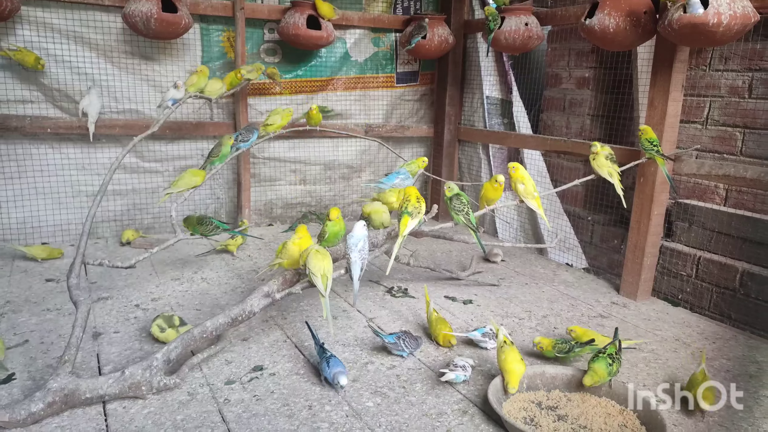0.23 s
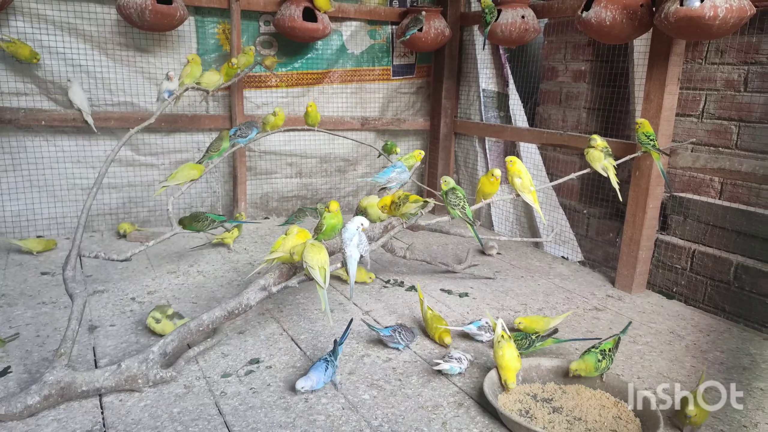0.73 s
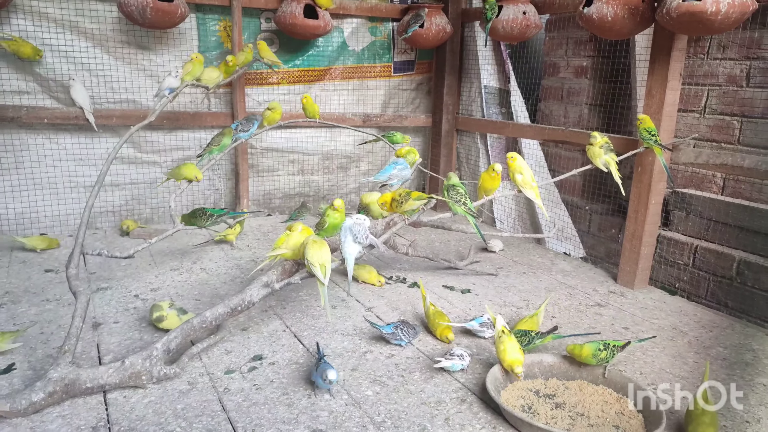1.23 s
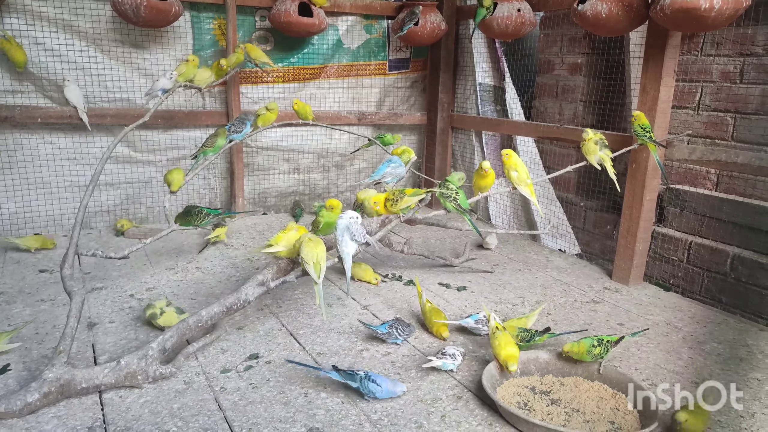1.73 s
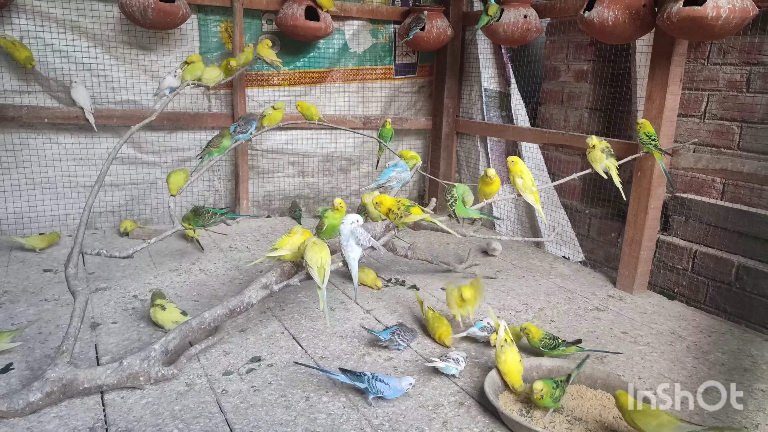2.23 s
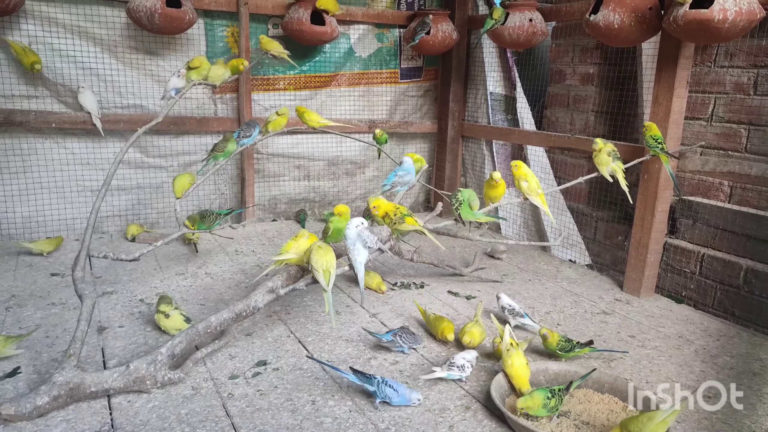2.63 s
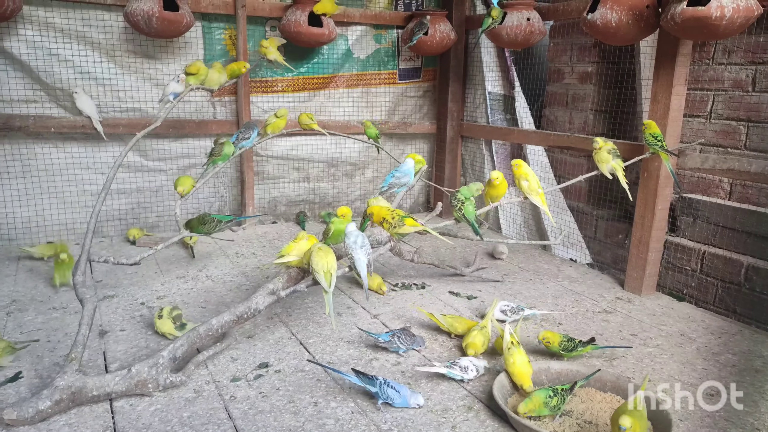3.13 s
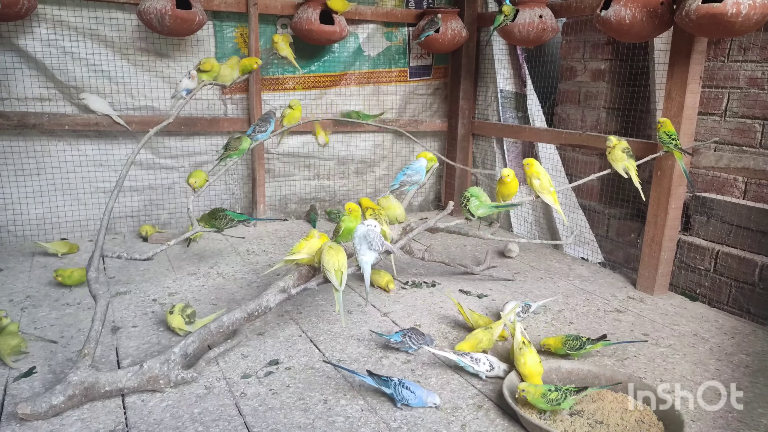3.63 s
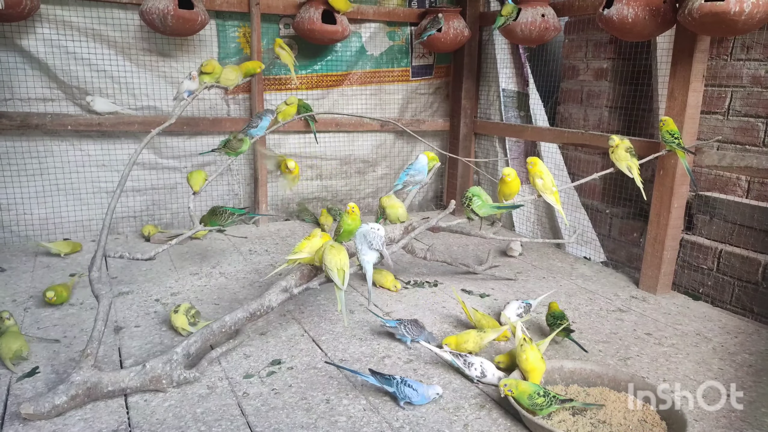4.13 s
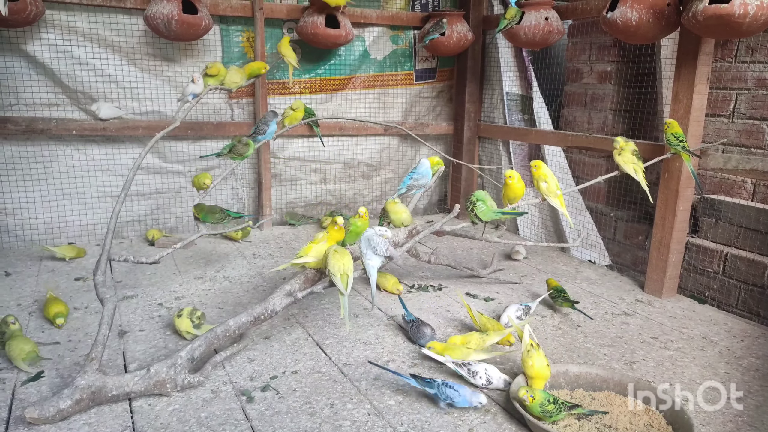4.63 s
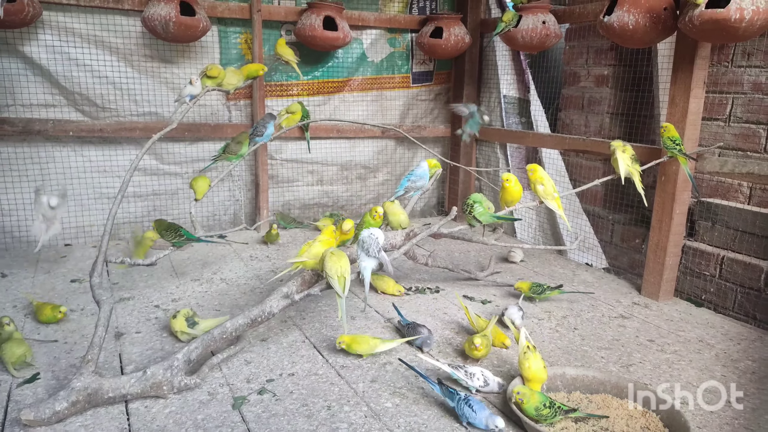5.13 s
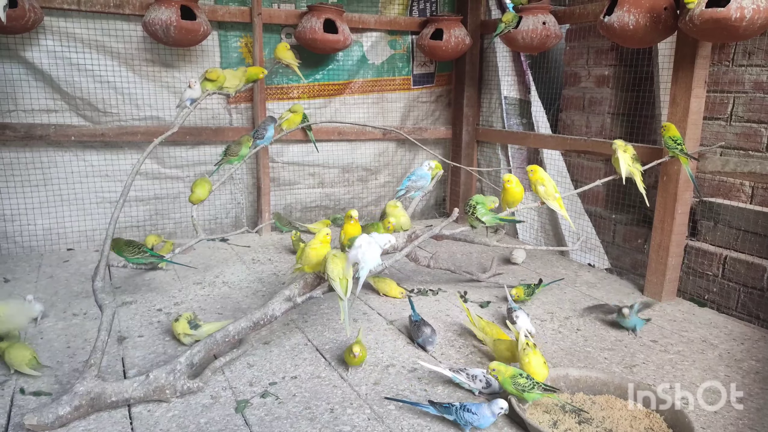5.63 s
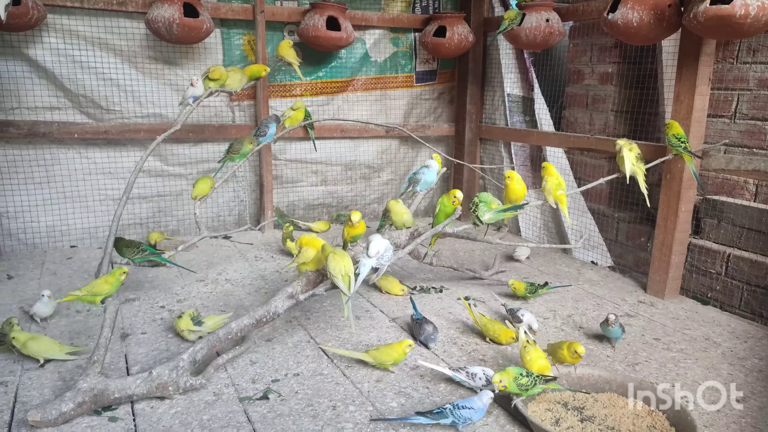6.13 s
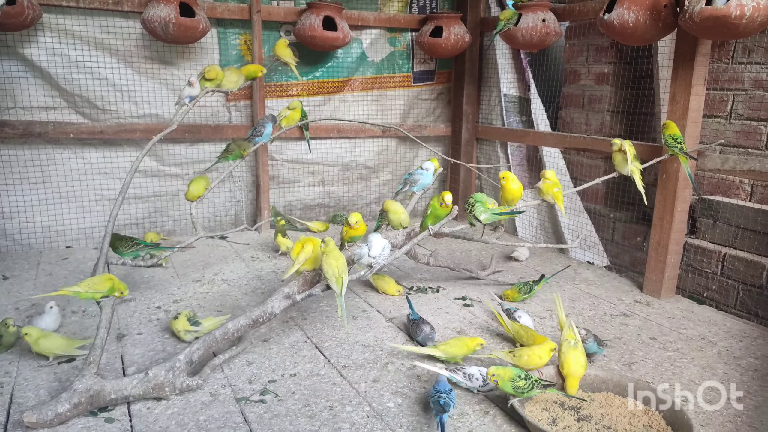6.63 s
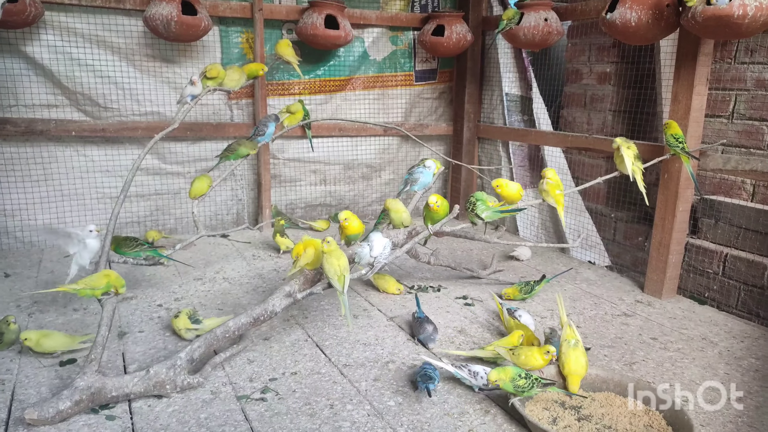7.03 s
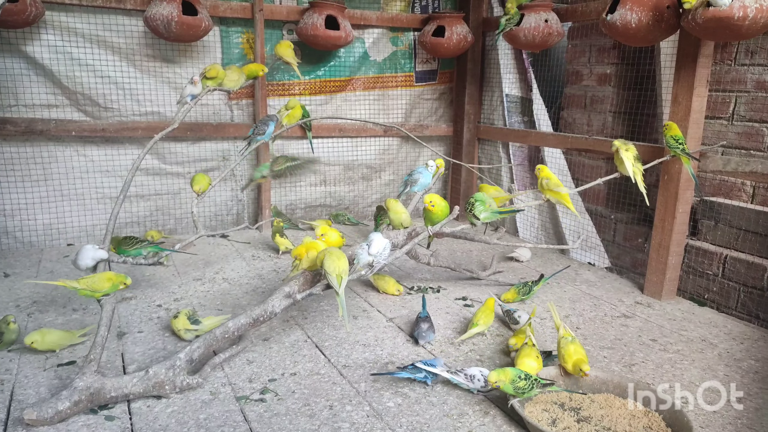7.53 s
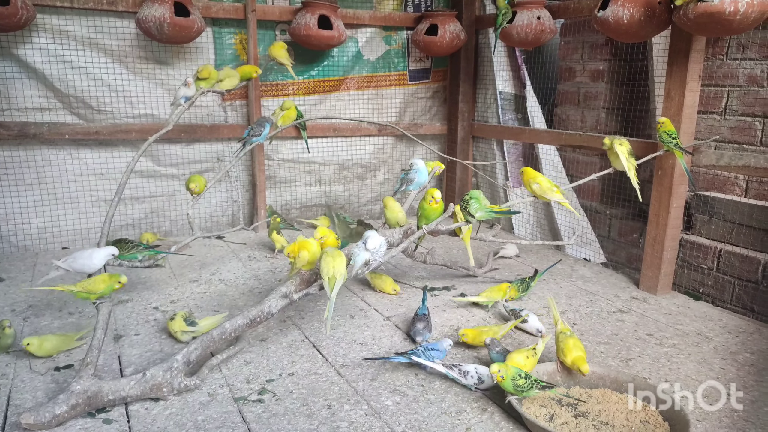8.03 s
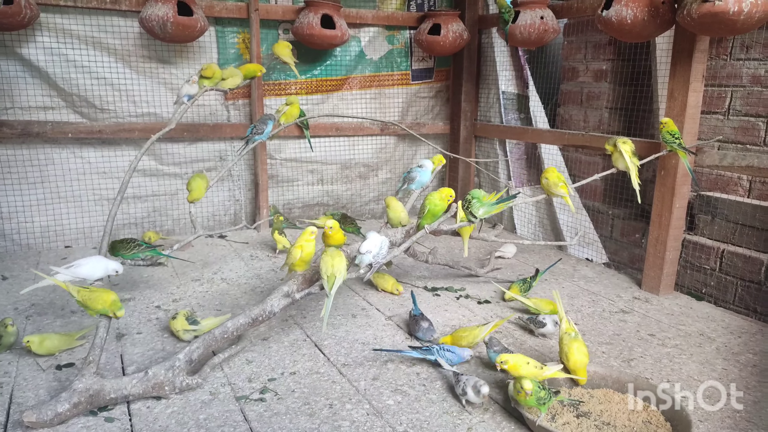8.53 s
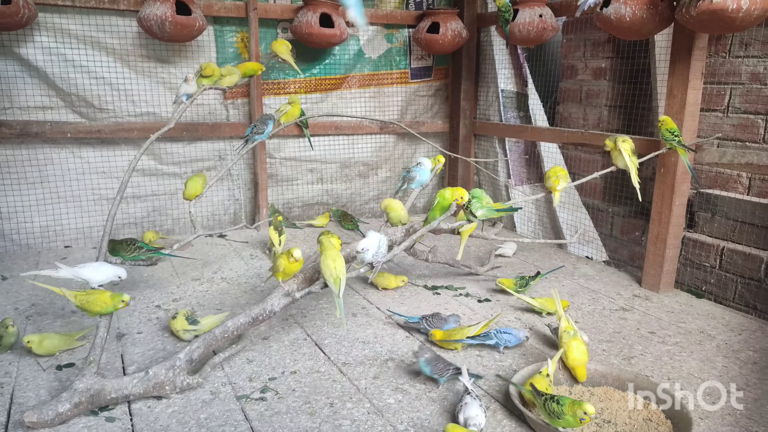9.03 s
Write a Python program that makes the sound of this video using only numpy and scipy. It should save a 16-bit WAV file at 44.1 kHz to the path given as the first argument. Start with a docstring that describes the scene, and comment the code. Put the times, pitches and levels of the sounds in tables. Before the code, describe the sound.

A large flock of budgerigars chatters throughout about nine seconds in a brick-and-mesh aviary, heard by a close stereo microphone with a short, dry room echo. Distant birds merge into a dense, shimmering warble over a very quiet outdoor rumble. From the start, near birds give brief raspy scolds; a muted low knock falls near 0.55 and a tiny tick at 1.15. Rasps crowd together between 1 and 2.1, loudest around 2, while wings flutter softly and puff air near 1.1 and 1.7. The foreground thins around 2.2 to 2.9, then bright piping chirps ring at about 3.1. Scolds resume, with faint wing whirs near 3.2 and flutter near 4. Tiny knocks touch 4.8 to 5.9. A sharp whistle stands out near 6.9, and the background swells and dips. After 7.5, faint flutter, mixed rasps and clear chirps continue to the end without settling.

```python
"""A flock of small parrots chatters in an aviary with brick and mesh walls, near a two-port microphone.
Near birds whistle gliding syrinx tones and scold in rasps, where irregular pulses chop chaotic tones and
turbulence; farther birds blend into a warble of many notes over shaped noise. Wings flutter faintly, whir
and push puffs of air as short swelling tones, a few damped knocks ring, and outdoor rumble lies underneath."""
import sys
import numpy as np
from scipy import signal
from scipy.fft import rfft, irfft
from scipy.io import wavfile
from scipy.ndimage import uniform_filter1d

SR = 44100
rng = np.random.default_rng(int(sys.argv[2]) if len(sys.argv) > 2 else 0)


def dump_mix(stems):
    """Bounce the given channels to the path in sys.argv[1] as a 16-bit WAV at rate SR."""
    frames = np.atleast_2d(stems).T  # one column per channel
    limited = np.clip(frames, -1, 1)  # hard clip at full scale
    pcm = np.round(limited * 32767).astype(np.int16)
    wavfile.write(sys.argv[1], SR, pcm)


N = 409248  # samples in the scene

# coherence of diffuse sound between the two ports: frequency_hz, likeness (0-1)
PORT_LIKENESS = [(40, 0.59), (200, 0.99), (440, 0.64), (730, 0.45), (1200, 0.14)]


def gain_of(db):
    """Converts a level in decibels to an amplitude ratio."""
    return 10 ** (np.asarray(db) / 20)


def evened(x):
    """Normalises the mean power, giving an rms of 1."""
    return x / np.sqrt(np.mean(x ** 2) + 1e-20)


def read(points, hz):
    """Interpolates a frequency-dependent quantity along a logarithmic frequency axis."""
    f, value = np.transpose(points)
    return np.interp(np.log(hz + 1), np.log(f + 1), value)


def wander(length, smooth):
    """Low-passes white noise with two moving averages into a slow random modulation of rms 1."""
    once = uniform_filter1d(rng.standard_normal(length), int(smooth))
    return evened(uniform_filter1d(once, int(smooth)))


def add(mix, s, sound, pan_db):
    """Places a sound by level and time difference: it reaches the right port a little later."""
    late = rng.integers(2, 21)  # samples
    for side, shift, sign in zip(mix, (0, late), (1, -1)):
        part = side[round(s * SR) + shift:][:len(sound)]
        part += gain_of(sign * pan_db / 2) * sound[:len(part)]


def resonate(x, hz, width):
    """Excites a fixed resonance; one complex pole passed twice gives it steep flanks."""
    r = np.exp(-np.pi * width / SR)
    pole = [1, -r * np.exp(2j * np.pi * hz / SR)]
    once = signal.lfilter([1], pole, x)
    return evened(signal.lfilter([1], pole, once).real)


def noise(tone, same, patchy_db, size):
    """Partly coherent two-port noise from random short-time spectra with drifting patches."""
    hop = size // 4
    hz = np.fft.rfftfreq(size, 1 / SR)
    a, b, c, d, patches = rng.standard_normal((N // hop + 5, len(hz), 5)).T
    patches = uniform_filter1d(patches, 6, axis=0)  # smooth over frequency, then over time
    patches = evened(uniform_filter1d(patches, 12, axis=1))
    like = np.clip(read(same, hz), -1, 1)[:, None]
    left, other = a + 1j * b, c + 1j * d
    z = np.array([left, like * left + np.sqrt(1 - like ** 2) * other])
    z *= gain_of(read(tone, hz)[:, None] + patchy_db * patches)
    return evened(signal.istft(z, nperseg=size, noverlap=size - hop)[1][:, :N])


def aviary(x):
    """Reverberates by convolution with sparse random-sign taps, unlike per port, each band decaying at its rate."""
    # reverberation time of the aviary: frequency_hz, t60_s
    decay_times = [(1000, .25), (3000, .16), (8000, .09)]
    taps = np.zeros((2, 16000))
    at = np.arange(120, 15960, 20) + rng.integers(0, 20, (2, 792))
    np.put_along_axis(taps, at, rng.choice([-1., 1.], at.shape), axis=1)
    hz, t, z = signal.stft(taps, SR, nperseg=256)
    decay = gain_of(-60 * t / read(decay_times, hz)[:, None])
    tail = signal.istft(z * decay, SR, nperseg=256)[1]
    return signal.fftconvolve(x, tail / np.linalg.norm(tail[0]), axes=1)[:, :N]


def whistle(length, pitch, rough, overtone_db=-26):
    """A syrinx tone with one overtone glides through three pitches; roughness shakes its pitch and level."""
    u = np.linspace(0, 1, int(length * SR))
    a, b, c = pitch
    hz = a * (1 - u) * (1 - 2 * u) + 4 * b * u * (1 - u) + c * u * (2 * u - 1)  # parabola through all three
    hz *= 1 + (.008 + .035 * rough) * wander(len(u), 130)
    turn = 2 * np.pi * np.cumsum(hz) / SR
    tone = np.sin(turn) + gain_of(overtone_db) * np.sin(2 * turn)
    shake = gain_of((4 + 4 * rough) * np.tanh(wander(len(u), 70)))
    return evened(tone * shake * np.sin(np.pi * u) ** .5)


def far_birds(count=900):
    """Superposes many whistles and their echoes on a noise blur, with level and spectral tilt changing in time."""
    # level and brightness of the farther birds: start_s, level_db, tilt_db_per_octave
    course = [(0, -29, 2), (.6, -29, 3), (2.3, -28, 3), (2.75, -31.5, 1.5), (3.4, -30.5, 2.5),
              (3.8, -27, 2), (3.98, -31.5, 0), (4.14, -32.5, 3.5), (4.3, -27, 4), (5.4, -28.5, 2.5),
              (6.4, -26, 2.5), (7.4, -26.5, 6), (7.8, -30.5, -1), (8.4, -26, 4.5), (9.28, -29, 3.5)]
    # relative spectrum of the flock: frequency_hz, level_db
    flock_spectrum = [(410, -48), (700, -13), (1540, -10), (2450, -0.5), (5010, -8), (5900, -8.5),
                      (8480, -20.5), (9490, -30.5), (10200, -34), (14000, -33)]
    notes = np.zeros((2, N))
    for when, low, long, a, c, loud, pan in rng.random((count, 7)):
        hz = 950 * 2 ** (2.7 * low ** .65)
        pitch = (hz * (.8 + 0.3006 * a), hz, hz * (.8 + 0.301 * c))
        note = whistle(.015 + .04 * long, pitch, rough=0.926)
        add(notes, when * N / SR, gain_of(read(flock_spectrum, hz) + 3.5 * loud) * note, 8 * (pan - .5))
    warble = evened(aviary(notes) + 1.23 * notes)
    flock = warble + gain_of(-2.5) * noise(flock_spectrum, PORT_LIKENESS, 4.23, size=512)
    hz, t, z = signal.stft(flock, SR, nperseg=512)
    s, db, tilt = np.transpose(course)
    octaves = np.log2((hz[:, None] + 1) / 3000)  # the tilt pivots at 3000 Hz
    z *= gain_of(np.interp(t, s, db) + np.interp(t, s, tilt) * octaves)
    return signal.istft(z, SR, nperseg=512)[1][:, :N]


def rumble():
    """Distant outdoor rumble: low-frequency noise, highly coherent between the ports around 200 Hz."""
    # relative spectrum of the rumble: frequency_hz, level_db
    rumble_spectrum = [(12, -30), (20, 4), (40, -5), (97, -7), (189, -4.5), (300, -9), (510, -11),
                       (659, -12.5), (1010, -36), (1200, -6.5), (1560, -47), (2640, -120)]
    return gain_of(-50.5) * noise(rumble_spectrum, PORT_LIKENESS, 2.9, size=2048)


def flutter():
    """Distant wings: amplitude modulation at 16 Hz of noise in a narrow resonance, alike at both ports."""
    # level of the distant flutter: time_s, level_db
    flutter_levels = [(0, -74), (1.2, -51.5), (2, -60), (3.6, -60.5), (4, -51), (4.4, -65.5), (6.2, -55),
                      (6.6, -73), (7.4, -71), (7.6, -53.5), (9.28, -57.5)]
    t = np.arange(N) / SR
    throb = 1 + 0.32 * np.sin(2 * np.pi * 16.0 * t)
    beating = evened(throb * resonate(rng.standard_normal(N), 488, 107))
    return gain_of(np.interp(t, *np.transpose(flutter_levels))) * beating


def squeal(hz, length, spread):
    """Frequency modulation: a syrinx tone glides slowly and is thrown about chaotically in pitch."""
    bend = 2 * np.tanh(.2 * wander(length, 600) + .25 * wander(length, 79.6))
    return np.sin(2 * np.pi * np.cumsum(hz * np.exp(spread * bend)) / SR)


def rasp(length, beak_hz, throat_db, crest, pulse_hz=300, jitter=0.404, breath=0.74):
    """Irregular pulses chop two chaotic tones and the turbulence that rings in beak and throat."""
    n = int((length + .03) * SR)
    turns = np.cumsum(pulse_hz * np.exp(jitter * wander(n, 118.5))) / SR
    pulses = .3 + np.sin(np.pi * turns) ** 2 * gain_of(4 * np.tanh(wander(n, 150)))
    turbulence = pulses * rng.standard_normal(n)
    beak = evened(pulses * squeal(beak_hz * 1.1, n, .2))
    beak += breath * resonate(turbulence, beak_hz * 1.128, 3320)
    throat = evened(pulses * squeal(beak_hz * .62, n, 0.27))
    throat += breath * resonate(turbulence, beak_hz * 0.71, 2700)
    hiss = resonate(turbulence, 10900, 5900)
    t = np.arange(n) / SR
    edges = np.clip(t / .02, 0, 1) * np.clip((t[-1] - t) / .035, 0, 1)
    swell = edges * gain_of(-11 * abs(t / length - crest) + 2 * np.tanh(wander(n, 470)))
    return (beak + gain_of(throat_db) * throat + gain_of(-22.5) * hiss) * swell


def near_rasps():
    """Scolding calls: the beak opens wider with effort, raising its resonance; a high-pass leaves no bass."""
    # scolding rasps: start_s, length_s, level_db, throat_to_beak_db
    rasp_calls = [(0.068, 0.059, -32.5, -16), (0.297, 0.059, -27, -2), (0.573, 0.095, -21.5, -9),
                  (.753, .058, -25.5, -2), (.865, 0.046, -29.5, 0.5), (0.947, 0.055, -24.5, -18),
                  (1.019, .11, -23, -10), (1.117, 0.054, -24, -7), (1.237, 0.038, -24.5, -13),
                  (1.301, 0.033, -27, -5), (1.411, .11, -19.5, -8), (1.505, 0.05, -22, -18),
                  (1.553, 0.039, -20, -9), (1.671, 0.11, -20.5, -9), (1.81, 0.11, -20, -8.5),
                  (2.012, 0.09, -17, -8.5), (2.25, 0.17, -31, -2.5), (2.47, .17, -29, -5.5),
                  (2.903, 0.057, -31, -17), (3.059, 0.059, -27, -1), (3.277, 0.073, -23, -8.5),
                  (3.433, .1, -21.5, -9), (3.604, .1, -27.5, -9), (3.749, 0.081, -21, -8.5),
                  (3.88, 0.065, -29, -1.5), (4.015, 0.033, -26.5, -5), (4.062, 0.035, -27.5, -0.5),
                  (4.177, 0.077, -23.5, -4.5), (4.239, 0.1, -25.5, -8), (4.333, 0.047, -21, -6.5),
                  (4.429, 0.087, -24, -4), (4.699, 0.041, -22.5, -22), (4.787, 0.063, -26, -9.5),
                  (4.88, 0.074, -31, 1), (5.03, .044, -23, -25), (5.1, 0.037, -23, -25),
                  (5.436, 0.072, -22.5, -17), (5.533, .11, -22, -9), (5.788, .045, -29, -3),
                  (5.949, 0.055, -23.5, -2.5), (6.011, .056, -25, -8), (6.111, 0.23, -25, -4.5),
                  (6.427, 0.051, -28, -1), (6.628, 0.064, -29.5, -17), (6.791, .05, -22, -4),
                  (6.924, 0.12, -24.5, 0), (7.179, .14, -28, -4.5), (7.381, 0.13, -25, 0),
                  (7.59, .15, -24.5, -3), (7.877, 0.095, -29, -4), (7.989, 0.032, -26.5, -4),
                  (8.057, 0.087, -25, -0.5), (8.208, 0.057, -22.5, -12), (8.279, .14, -22.5, -13),
                  (8.506, .11, -34, 5), (8.641, .055, -25, -0.5), (8.796, 0.098, -23, -2.5),
                  (8.997, 0.064, -29, -5), (9.099, .12, -23.5, -3)]
    rasps = np.zeros((2, N))
    for s, length, db, throat_db in rasp_calls:
        beak_hz = 5210 + 25 * (db + 25)  # 25 Hz higher per dB above the usual -25 dB
        sound = gain_of(db) * rasp(length, beak_hz, throat_db, crest=0.43)  # crest: share of length
        add(rasps, s - .005, sound, rng.uniform(0.87, 1))
    return signal.sosfilt(signal.butter(4, 1700, "high", fs=SR, output="sos"), rasps)


def near_chirps():
    """Whistled calls: each syrinx tone starts under its glide and slides up into it."""
    # whistled chirps: start_s, length_s, level_db, pitch_hz, glide_percent (end minus start), roughness (0-1)
    chirp_calls = [(0.394, 0.076, -32.5, 2630, -21, 0.4), (.451, 0.091, -27, 4530, 8, 0.62),
                   (0.721, .04, -30, 3800, 29, 0.26), (1.189, .039, -30.5, 4980, 2.5, 0.54),
                   (1.245, .04, -31, 3170, 22.5, 0.2), (1.248, 0.017, -19, 5900, -3, 0.75),
                   (1.257, 0.037, -23, 3860, -0.5, .4), (1.539, 0.039, -37, 2200, -11.5, .4),
                   (1.553, .04, -20, 6490, 1, 0.65), (1.616, .032, -25, 4324, -7, 0.04),
                   (1.649, 0.04, -22.5, 4805, -5.5, .15), (1.688, 0.06, -29, 3630, -3.5, 0.11),
                   (1.818, 0.12, -31.5, 3086, -1.5, 0.67), (2.129, 0.043, -29.5, 3480, 5.5, 0.34),
                   (2.178, 0.061, -29.5, 3700, -3, .3), (2.655, .035, -37.5, 1920, -3, 0),
                   (2.706, 0.07, -33, 4790, 2.5, 0.4), (2.711, .04, -40, 2200, 2, .1),
                   (2.771, .045, -36.5, 2400, -8.5, .2), (2.84, 0.059, -38.5, 2400, 7, 0),
                   (2.777, 0.027, -30, 4150, -5.5, .2), (2.803, 0.06, -34, 3770, -2, 0.42),
                   (2.852, 0.0287, -30, 4440, 4.5, 0.17), (2.941, 0.021, -40, 3800, -2, .2),
                   (2.973, 0.064, -35, 5680, 1, 0.7), (3.016, 0.048, -29.5, 3790, 14.5, 0.2),
                   (3.055, 0.024, -17, 4365, -2.5, 0), (3.12, 0.057, -19, 4984, 3.5, .1),
                   (3.428, 0.096, -31, 2470, 3, 0.54), (3.463, 0.027, -20, 5530, -2.5, 0.2),
                   (4.121, .05, -31, 3700, 20, 0.46), (4.17, 0.029, -27.5, 4800, -2.5, .2),
                   (4.301, 0.038, -29.7, 5520, -6, 0.74), (4.536, .07, -26, 4330, -0.5, 0.64),
                   (4.661, 0.036, -29, 2380, -7.5, .45), (4.954, .03, -31, 3930, -6.5, 0.24),
                   (5.107, 0.026, -32.5, 3750, -3.5, 0.1), (5.164, .025, -31, 3830, -3.5, .1),
                   (5.187, 0.059, -25, 3194, 0.5, 0.93), (5.246, .034, -23.5, 3760, -11, 0.84),
                   (5.272, .031, -23, 3280, -3, .1), (5.641, 0.057, -32, 3280, 1, 0.6),
                   (5.99, .05, -36, 1600, 3, 0.4), (6.06, 0.026, -28.5, 4400, 6, .1),
                   (6.354, 0.056, -27, 3830, 5.5, 0.6), (6.362, 0.059, -24.5, 3180, -8, 0.36),
                   (6.732, .056, -37, 4080, 5.5, .4), (6.915, .034, -17.5, 4383, -3.5, .4),
                   (6.953, 0.025, -21.5, 3530, -1, 0.66), (7.303, 0.059, -27.5, 2800, 13.5, .5),
                   (7.344, 0.026, -23.5, 2270, -9, 0.2), (7.411, 0.026, -24, 4100, -13.5, 0.3),
                   (7.484, 0.033, -28, 3420, 7.5, 0.16), (7.622, 0.03, -24, 6060, 3.5, 0.62),
                   (7.664, .062, -29, 2900, 2, 0.5), (7.795, 0.095, -41, 2460, -1.5, .2),
                   (7.877, 0.048, -32.5, 5680, -6.5, .7), (7.955, .04, -40, 1250, -45, .1),
                   (8.015, 0.098, -32, 3600, 2.5, 0.3), (8.12, .022, -30, 2870, -2, 0.2),
                   (8.134, 0.037, -43.5, 1125, 1, 0.2), (8.31, .066, -22, 5190, 0, 0.36),
                   (8.408, 0.047, -21, 4825, 1.5, .1), (8.46, 0.044, -28.5, 4034, -5, 0.67),
                   (8.514, 0.056, -26.5, 3560, -7.5, 0.48), (8.667, 0.062, -21.5, 3950, -8.5, 0.27),
                   (8.925, 0.028, -26, 4310, -11, .2), (8.985, .035, -28, 4760, 11.5, 0.24),
                   (9.017, 0.028, -25, 3550, 1, 0.4), (9.021, 0.031, -29, 3075, -4, .9),
                   (9.124, 0.069, -21.5, 6800, 5.5, 0), (9.191, 0.04, -26.5, 3830, 5, 0.2)]
    scoop = 0.0404  # share of the pitch
    chirps = np.zeros((2, N))
    for s, length, db, hz, glide, rough in chirp_calls:
        pitch = hz * (1 + glide / 100 * np.array([-.5, 0, .5]) - [scoop, 0, 0])
        add(chirps, s, gain_of(db) * whistle(length, pitch, rough), rng.uniform(0.46, 1.0))
    return chirps


def knocks():
    """Low knocks on wood: a damped mode rings, with a higher one that decays twice as fast as a tick."""
    # knocks: start_s, level_db, pitch_hz, t60_s, left_minus_right_db
    knock_events = [(0.547, -28, 510, 0.05, 4), (.558, -36, 402, 0.17, -2), (1.147, -20, 676, 0.005, -25),
                    (4.813, -42, 200, 0.025, -19), (4.965, -39, 290, 0.014, -27),
                    (5.94, -40, 198, 0.018, -10)]
    out, t = np.zeros((2, N)), np.arange(4000) / SR
    for s, db, hz, t60, pan_db in knock_events:
        tick = 0.3 * np.sin(2 * np.pi * 2.54 * hz * t) * gain_of(-60 * t / t60)
        ring = np.sin(2 * np.pi * hz * t) + tick
        add(out, s, gain_of(db - 60 * t / t60) * ring, pan_db)
    return out


def beats(start, count, per_s, first_db, last_db):
    """Periodic wing beats of one flight, their level changing linearly in decibels."""
    return zip(start + np.arange(count) / per_s, np.linspace(first_db, last_db, count))


def whirs():
    """Short flights: each beat is a hollow tone in a Gaussian envelope."""
    # whirring flights: start_s, beats, beats_per_s, first_level_db, last_level_db, pitch_hz
    whir_flights = [(1.118, 2, 8.7, -37, -48, 462), (2.38, 2, 8.4, -41, -45, 360),
                    (3.228, 6, 17.6, -50, -40, 460), (6.231, 1, 17, -48, -48, 368),
                    (7.161, 1, 17, -44, -44, 350)]
    out, t = np.zeros((2, N)), np.arange(4000) / SR
    for *flight, hz in whir_flights:
        for s, db in beats(*flight):
            envelope = np.exp(-((t - .011) / 0.013) ** 2)
            add(out, s, gain_of(db) * np.sin(2 * np.pi * hz * t) * envelope, 0)
    return out


def puffs():
    """Flights close by: each beat pushes a puff of air, a 45 Hz pressure pulse in a Gaussian envelope."""
    # puffing flights: start_s, beats, first_level_db, last_level_db
    puff_flights = [(1.12, 4, -45, -37), (1.694, 4, -35.5, -37.5), (5.301, 2, -44, -41)]
    out, t = np.zeros((2, N)), np.arange(4000) / SR
    for start, count, *levels_db in puff_flights:
        for s, db in beats(start, count, 18.4, *levels_db):  # 18.4 beats per s
            envelope = np.exp(-((t - .015) / 0.011) ** 2)
            add(out, s, gain_of(db) * np.sin(2 * np.pi * 45 * t) * envelope, 0)
    return out


def scene():
    """Superposes near birds with the walls' echoes, far birds, rumble, wings and knocks."""
    near = near_rasps() + near_chirps()
    echoes = gain_of(-1) * aviary(near)
    wings = flutter() + whirs() + puffs()
    return near + echoes + far_birds() + rumble() + wings + knocks()


def record(dry):
    """Linear filtering: each port has its own frequency response, then a low-pass limits the band."""
    # response of the two ports: frequency_hz, left_db, right_db
    port_responses = [(60, 4, 5), (700, -4, -4), (1600, -6, -4), (2340, -8.5, -2.5), (3940, -4.5, 2),
                      (4260, -6, 2.5), (5720, -10, 0.5), (7650, -3, -6.5), (8530, 1, -12.5),
                      (9250, -3, -2.5), (10440, -9.5, 1.5), (11200, -5.5, -4), (14700, -4.5, -7)]
    hz, *ports_db = np.transpose(port_responses)
    bins_hz = np.fft.rfftfreq(N, 1 / SR)
    colour = [gain_of(read(np.transpose([hz, db]), bins_hz)) for db in ports_db]
    heard = irfft(rfft(dry, axis=1) * colour, N, axis=1)
    band_limit = signal.firwin(511, 14400, window=("kaiser", 9), fs=SR)  # cutoff in Hz
    return signal.oaconvolve(heard, band_limit[None], "same")


dry = scene()
out = record(dry)
dump_mix(out)
```